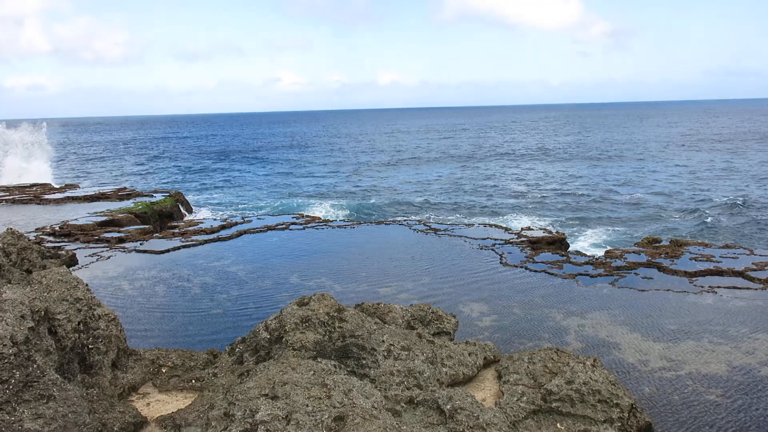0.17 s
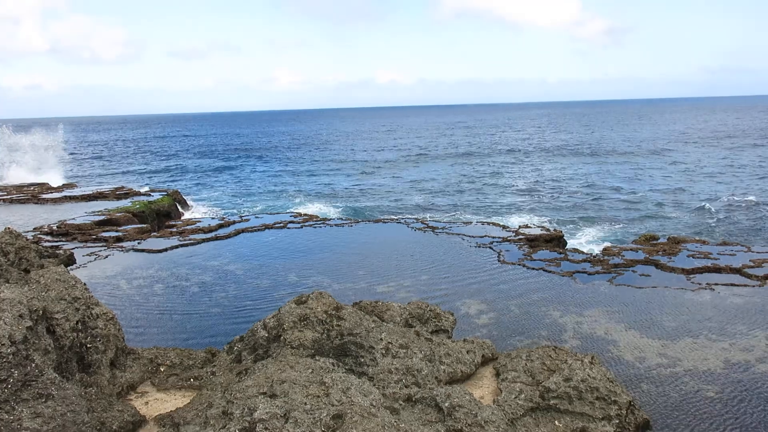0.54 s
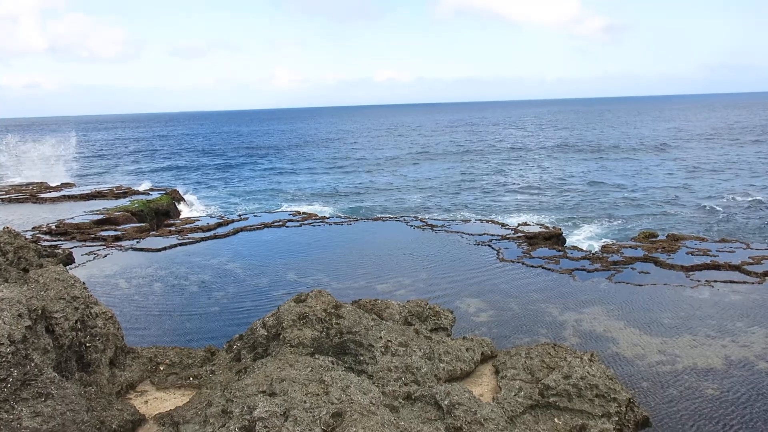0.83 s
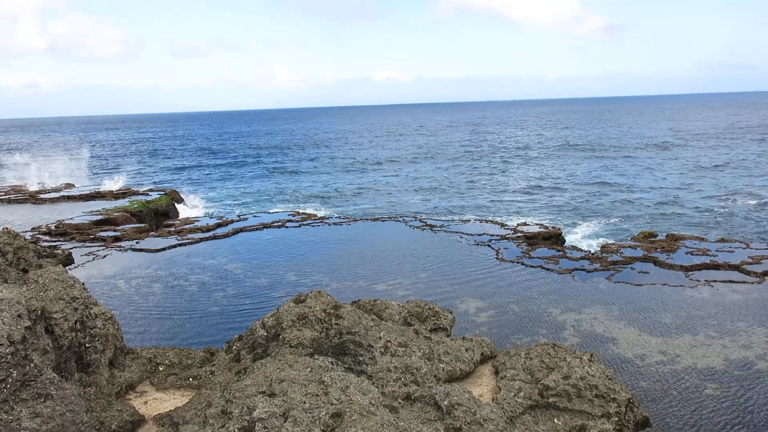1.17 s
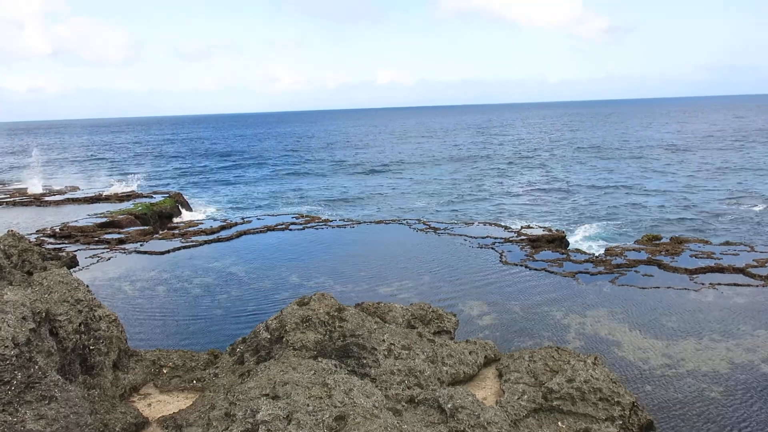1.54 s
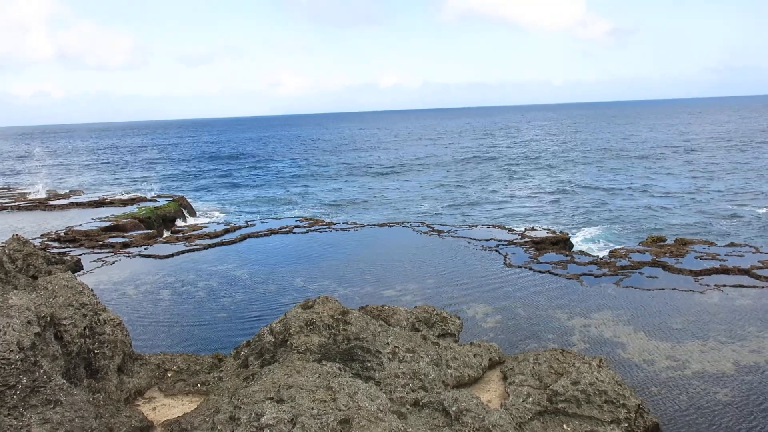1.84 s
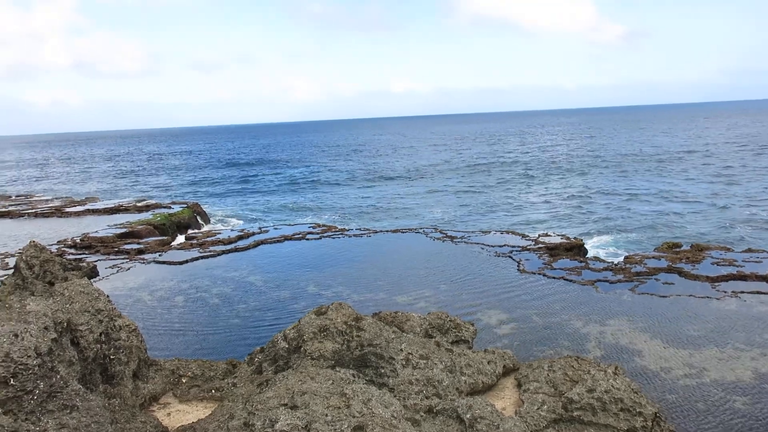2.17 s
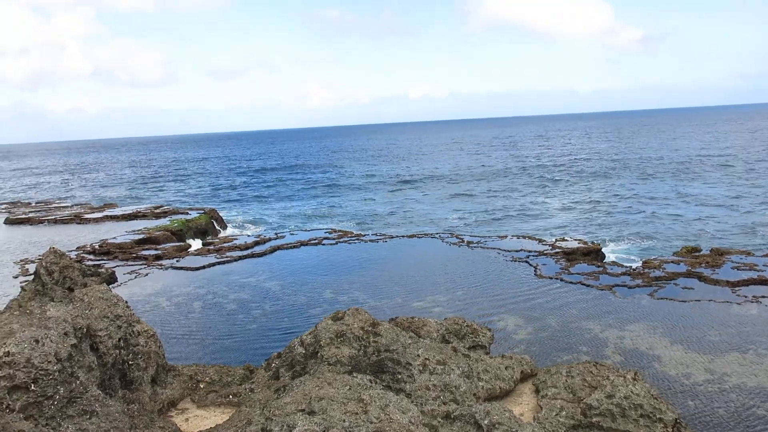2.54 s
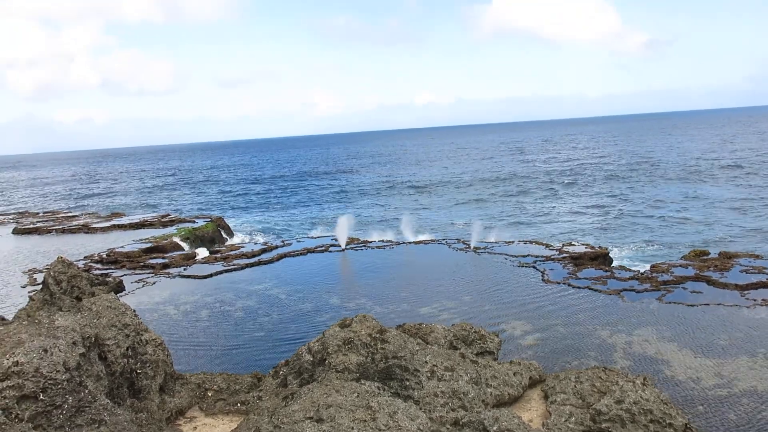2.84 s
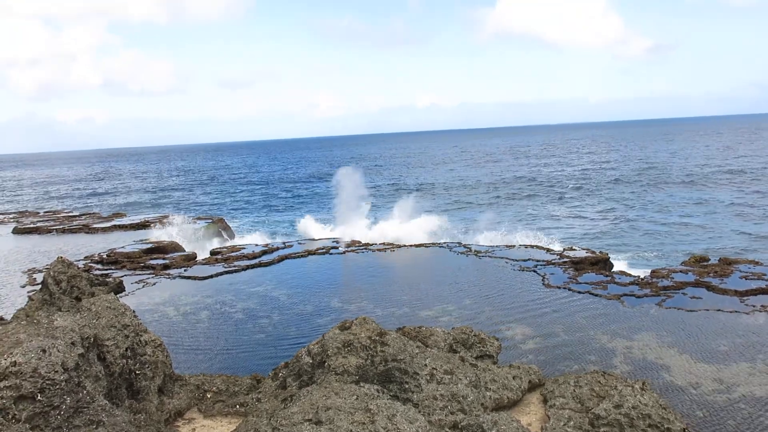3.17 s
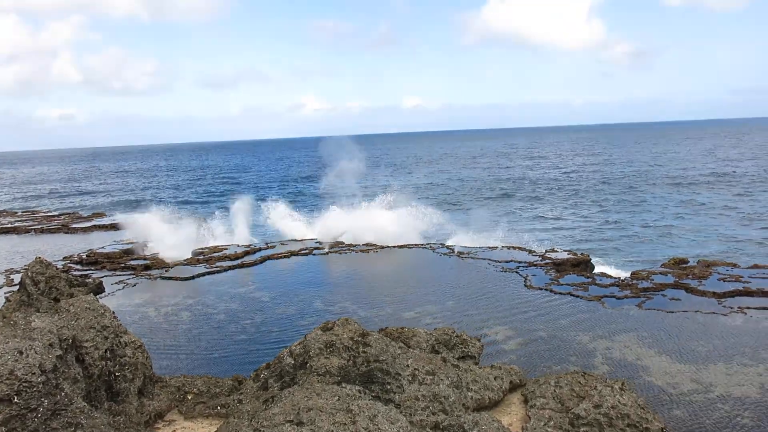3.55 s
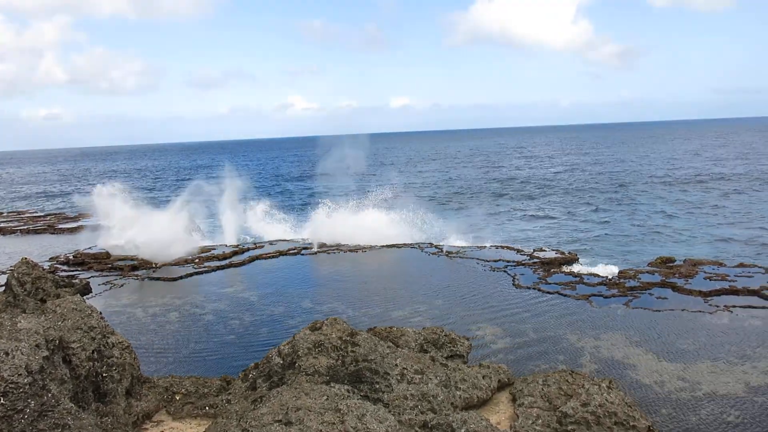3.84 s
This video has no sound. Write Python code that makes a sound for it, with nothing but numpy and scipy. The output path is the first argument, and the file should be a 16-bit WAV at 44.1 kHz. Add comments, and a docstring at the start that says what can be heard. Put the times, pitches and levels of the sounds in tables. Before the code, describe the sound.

Blowholes erupt on a rocky shore. Silence until 0.25 s, then faint, even surf and foam cut in abruptly, with low wind thuds on the stereo microphone, strongest near 0.85 and 2 s. From 2.3 s a deep swell rumble grows; thin air hiss leads into a sputtering water roar at 3 s with rapid hard slaps and spattering drops. It dips around 3.35 s, then a wider spray burst swells, slaps at 3.73 s and continues to the end.

```python
"""Steady surf on a rocky shore, heard from a ledge while wind buffets the microphone.
A swell then rumbles in under the rock and drives air, then water, out of the blowholes:
a thin hiss, a sputtering roar with a few hard slaps, then a second, wider burst of spray.
Surf, swell, jets and spray are coloured noise under level curves, with clicks for drops;
the slaps are short rings, and the wind is low noise pushing the two sides in opposition."""
import sys
import numpy as np
from scipy import signal
from scipy.fft import rfft, irfft
from scipy.io import wavfile

SR = 44100
rng = np.random.default_rng(int(sys.argv[2]) if len(sys.argv) > 2 else 0)


def pcm_store(signal):
    """Save signal as 16-bit PCM."""
    levels = np.round(np.clip(np.atleast_2d(signal), -1, 1) * 32767)
    wavfile.write(sys.argv[1], SR, levels.astype(np.int16).T)


N = 176400
TIME = np.arange(N) / SR
FREQ = np.maximum(np.arange(N // 2 + 1) * SR / N, 1)
OPPOSED = np.array([[1], [-1]])   # signs of left and right


def from_db(db):
    """Turn decibels into an amplitude factor."""
    return 10 ** (np.asarray(db) / 20)


def rms_one(x):
    """Scale to an overall rms of 1."""
    return x / np.sqrt(np.mean(x ** 2) + 1e-20)


def in_time(rows):
    """A curve of (s, value) at every sample; the end values are held."""
    return np.interp(TIME, *np.transpose(rows))


def over_hz(points):
    """A curve of (Hz, value) at every frequency, straight over log frequency."""
    hz, value = np.transpose(points)
    return np.interp(np.log(FREQ), np.log(hz), value)


def tint(x, db):
    """Filter by a gain in dB at every frequency."""
    return irfft(rfft(x) * from_db(db), N)


def drift(rate_hz):
    """Slow chance with about this many turns a second; rms 1."""
    noise = rfft(rng.standard_normal(N))
    return rms_one(irfft(noise / (1 + (FREQ / rate_hz) ** 2), N))


def turbulence(rough_db, rate_hz):
    """Two noises that sputter together, by rough_db rms."""
    return rng.standard_normal((2, N)) * from_db(rough_db * drift(rate_hz))


def stereo(pair, colour, width):
    """Two unrelated signals become the coloured middle and side of one sound; middle rms 1."""
    mid = tint(pair[0], over_hz(colour))
    side = tint(pair[1], over_hz(colour) + over_hz(width))
    return (mid + OPPOSED * side) / np.std(mid)


# colour of the distant surf: pitch_hz, relative_db per Hz
SURF_COLOUR = [(18, -40), (30, -5.5), (92, 4.5), (129, 3), (176, 0.5), (211, 1), (274, 1.5), (524, -5.5),
               (698, -6), (953, -9), (1440, -7), (3070, -18), (5880, -23.5), (12800, -37.5), (15000, -43)]
# spread of surf and foam around the listener: pitch_hz, side_minus_mid_db
SURF_WIDTH = [(60, -1), (200, -2.5), (700, 1), (1500, -3.5), (4000, -5.5), (8000, 0.5), (13000, 9.5)]
# strength of the surf's upper middle: time_s, level_db
SURF_LEVEL = [(.25, -41.5), (.55, -42), (.7, -41.5), (.95, -42.5), (1.25, -43), (1.55, -45), (1.78, -41.5),
              (2.05, -44), (2.28, -43.5), (2.7, -41.5)]
SURF_BODY_DB = 7   # whole wash above the level of its upper middle


def surf():
    """Many far breakers merge into an even wash of noise."""
    wash = stereo(turbulence(rough_db=1.0, rate_hz=16), SURF_COLOUR, SURF_WIDTH)
    return wash * from_db(in_time(SURF_LEVEL) + SURF_BODY_DB)


# colour of foam on the nearer reef: pitch_hz, relative_db per Hz
FOAM_COLOUR = [(1000, -25), (3000, -4), (5500, 1), (8000, -5.5), (11000, -16), (15500, -34)]
# strength of the foam, before a trim of -0.5 dB: time_s, level_db
FOAM_LEVEL = [(.25, -49.5), (.9, -48), (1.4, -48), (1.6, -44.5), (1.78, -47), (2.1, -49), (2.4, -52.5),
              (2.65, -48)]


def foam():
    """Foam fizzes on the reef, nearer than the breakers: bright, quickly flickering noise."""
    fizz = stereo(turbulence(rough_db=1.3, rate_hz=90), FOAM_COLOUR, SURF_WIDTH)
    return fizz * from_db(in_time(FOAM_LEVEL) - 0.5)


# colour of wind at the microphone: pitch_hz, relative_db per Hz
WIND_COLOUR = [(20, -9), (45, -11), (85, 4.5), (130, -7), (200, -16), (350, -40), (1000, -69), (6000, -100)]
# gusts on the microphone, bell-shaped in time:
# centre_s, half_length_s (one standard deviation), opposed_db between the sides, shared_db by both
GUSTS = [(.34, 0.086, -34, -51), (0.765, 0.085, -31.5, -35), (0.847, 0.032, -20, -39),
         (.985, .03, -38, -31), (1.46, 0.011, -32, -53), (1.555, 0.025, -25, -52), (1.693, 0.035, -22, -41),
         (1.949, 0.0059, -7, -27.5), (1.981, 0.016, -17, -26.5), (2.066, 0.0052, -12, -26),
         (2.592, 0.0073, -17, -31.5), (2.743, 0.019, -31, -45), (3.49, 0.083, -39, -47)]
BREEZE_DB = -50   # opposed wind under and between the gusts


def wind():
    """Gusts thud on the microphone, mostly pushing its two sides in opposite directions."""
    opposed, shared = rms_one(tint(rng.standard_normal((2, N)), over_hz(WIND_COLOUR)))
    out = from_db(BREEZE_DB) * OPPOSED * opposed
    for centre_s, half_s, opposed_db, shared_db in GUSTS:
        gust = np.exp(-np.minimum(0.5 * ((TIME - centre_s) / half_s) ** 2, 20))
        push = from_db(opposed_db) * OPPOSED * opposed + from_db(shared_db) * shared
        out = out + gust * push
    return out


# colour of the swell under the ledge: pitch_hz, relative_db per Hz
SWELL_COLOUR = [(25, -39), (55, -6.5), (100, -2), (190, -0.5), (300, -2.5), (450, -10), (900, -10),
                (3000, -63)]
# spread of the swell: pitch_hz, side_minus_mid_db
SWELL_WIDTH = [(60, -37), (200, -24), (400, -13.5)]
# strength of the swell: time_s, level_db
SWELL_LEVEL = [(2.15, -41.5), (2.4, -33), (2.7, -31.5), (2.85, -25), (2.98, -27), (3.15, -28.5),
               (3.35, -29.5), (3.55, -29.5), (3.73, -21), (4, -25)]


def swell():
    """The wave churns in the hollows under the ledge: a low, nearly central rumble."""
    rumble = stereo(turbulence(rough_db=0.55, rate_hz=33), SWELL_COLOUR, SWELL_WIDTH)
    return rumble * from_db(in_time(SWELL_LEVEL))


# colour of the hissing air: pitch_hz, relative_db per Hz
AIR_COLOUR = [(1500, -22), (5000, -6), (9000, 2), (12500, 5), (15500, -2)]
# narrow spread of air, water and heavy drops at the vents: pitch_hz, side_minus_mid_db
JET_WIDTH = [(100, -23), (400, -17), (700, -19), (2000, -19), (5000, -27), (10000, -46), (15000, -22)]
# flow of the air forced out ahead of the water: time_s, level_db
AIR_FLOW = [(2.7, -80), (2.81, -52), (2.89, -39.5), (2.96, -36.5), (3.04, -45), (3.25, -80)]


def air_hiss():
    """Air squeezed through the vents ahead of the water becomes a thin turbulent hiss."""
    air = stereo(turbulence(rough_db=1.0, rate_hz=80), AIR_COLOUR, JET_WIDTH)
    return air * from_db(in_time(AIR_FLOW))


# colour of the water jet: pitch_hz, relative_db per Hz
ROAR_COLOUR = [(60, -27), (180, -9), (320, -6.5), (750, 1), (1400, -3.5), (2800, -18), (5500, -25),
               (8800, -28), (11800, -35), (15500, -48)]
# force of the water through the vents, two blows: time_s, level_db
FORCE = [(2.6, -36.5), (2.78, -30), (2.88, -23), (2.97, -13), (3.08, -13.5), (3.18, -17), (3.27, -27),
         (3.36, -31.5), (3.5, -29.5), (3.63, -24.5), (3.73, -20), (3.78, -21.5), (3.9, -21.5), (4, -24)]


def jet_roar():
    """Air and water sputter through the vents as rapidly wavering noise."""
    roar = stereo(turbulence(rough_db=1.0, rate_hz=140), ROAR_COLOUR, JET_WIDTH)
    return roar * from_db(in_time(FORCE))


DROPS_PER_S, DROP_SHARE = 700, 0.28   # clicks in each signal; their rms in the mix


def drops():
    """A dense patter of clicks of uneven size and either sign; rms 1."""
    size_db = 2.0 * np.minimum(rng.exponential(1, (2, N)), 4)
    clicks = from_db(size_db) * rng.choice([-1, 1], (2, N))
    return rms_one(clicks * (rng.random((2, N)) < DROPS_PER_S / SR))


# colour of the heavy drops: pitch_hz, relative_db per Hz
SPATTER_COLOUR = [(800, -1.5), (2000, 8.5), (3200, -7), (5400, -0.5), (7500, -5.5), (9500, -10),
                  (11500, -31), (15500, -37)]
# amount of heavy drops thrown up by the first jet: time_s, level_db
SPATTER_LEVEL = [(2.75, -80), (2.89, -55), (2.98, -27.5), (3.08, -23.5), (3.2, -27.5), (3.29, -43),
                 (3.45, -80)]


def spatter():
    """Heavy drops spatter above the first jet: rough noise mixed with clicks."""
    patter = turbulence(rough_db=2.6, rate_hz=120) + DROP_SHARE * drops()
    return stereo(patter, SPATTER_COLOUR, JET_WIDTH) * from_db(in_time(SPATTER_LEVEL))


# slugs of water slapping in the vent: start_s, level_db
SLAPS = [(2.999, -16), (3.028, -11), (3.067, -15), (3.733, -9)]
# ring of the vent: pitch_hz, level_db against the slap, t60_s
VENT_MODES = [(330, -7.5, 0.053), (716, -1.5, 0.017), (1400, -6, 0.0076)]


def slaps():
    """Each slug of water knocks the vent into a very short ring of decaying sines."""
    out = np.zeros(N)
    for start_s, slap_db in SLAPS:
        age = np.maximum(TIME - start_s, 0)
        for hz, mode_db, t60 in VENT_MODES:
            decay = np.exp(-np.minimum(np.log(1000) * age / t60, 20))
            out += from_db(slap_db + mode_db) * decay * np.sin(2 * np.pi * hz * age)
    return out


def burst(full_s, rise, hold_s, fall, db):
    """Swell, hold and die away, at rates in dB per second."""
    early = np.maximum(full_s - TIME, 0)
    late = np.maximum(TIME - full_s - hold_s, 0)
    return from_db(db - rise * early - fall * late)


# colour of spray hanging in the air: pitch_hz, relative_db per Hz
SPRAY_COLOUR = [(150, -6), (350, 12.5), (900, 6), (2000, -2), (3200, -2), (6000, -3), (10000, -7.5),
                (13000, -10.5), (15500, -16)]
# spread of the spray: pitch_hz, side_minus_mid_db
SPRAY_WIDTH = [(300, -8), (1500, -9), (4000, -8), (8000, -7), (13000, -1)]
# clouds of spray: full_s, rise_db_per_s, hold_s, fall_db_per_s, level_db
SPRAYS = [(3.018, 66, 0.15, 38, -49.5), (3.736, 20.5, 0.22, 22, -29.5)]


def spray():
    """Finer spray trails each blow, spread wider than the jets: noise mixed with clicks."""
    mist = turbulence(rough_db=1.0, rate_hz=16) + DROP_SHARE * drops()
    return stereo(mist, SPRAY_COLOUR, SPRAY_WIDTH) * sum(burst(*cloud) for cloud in SPRAYS)


# peaks and hollows the rocks put on the sea, at a share of 1: pitch_hz, width_hz, gain_db
ROCK_COLOUR = [(323, 25.4, 4), (402, 19, 1.5), (497, 39, -8), (572, 16.4, 2), (770, 56, -1), (888, 30, 3),
               (1016, 98, -11), (1366, 135, -5.5), (1570, 35, -1), (1850, 50, -6), (2070, 45, -3.5),
               (2410, 29, 4), (3630, 88, 4)]
LEDGE_ECHO_S, LEDGE_ECHO_DB = 0.00142, -16.5   # delay, and level at a share of 1


def off_rocks(pair, share):
    """The rocks colour the middle of a sound, and the ledge adds one close echo."""
    left, right = pair
    mid, side = (left + right) / 2, (left - right) / 2
    rocks_db = sum(db * np.exp(-0.5 * ((FREQ - hz) / width) ** 2) for hz, width, db in ROCK_COLOUR)
    echo = 1 + share * from_db(LEDGE_ECHO_DB) * np.exp(-2j * np.pi * FREQ * LEDGE_ECHO_S)
    return irfft(rfft(mid) * from_db(share * rocks_db) * echo, N) + OPPOSED * side


# lean of the sea between the two sides: pitch_hz, left_minus_right_db
BALANCE_DB = [(60, -0.5), (130, -2.0), (290, -3.5), (640, -0.5), (1410, 0.0), (3100, 1), (6820, 0.0),
              (15000, -0.5)]
LEFT_LEAD_S = 0.000012   # the sea reaches the left side first
SURF_ROCK_SHARE = 0.2    # the surf comes from all round, so it is coloured less
VENT_ROCK_SHARE = 0.86   # swell, jets, slaps and spray


def scene():
    """The sea, coloured by the rocks and a little to one side, and the wind."""
    far = surf() + foam()
    near = swell() + air_hiss() + jet_roar() + slaps() + spatter() + spray()
    sea = off_rocks(far, SURF_ROCK_SHARE) + off_rocks(near, VENT_ROCK_SHARE)
    # half the lead advances the left, half delays the right
    sea = irfft(rfft(sea) * np.exp(1j * np.pi * FREQ * LEFT_LEAD_S * OPPOSED), N)
    return tint(sea, OPPOSED * over_hz(BALANCE_DB) / 2) + wind()


START_S, CUTOFF_HZ = 0.2443, 15550


def record(dry):
    """After a silence the sound cuts in abruptly; a steep low-pass removes the top."""
    low_pass = signal.ellip(12, 0.1, 80, CUTOFF_HZ, fs=SR, output="sos")
    return signal.sosfilt(low_pass, dry * (TIME >= START_S) + 1e-18)


dry = scene()
out = record(dry)
pcm_store(out)
```